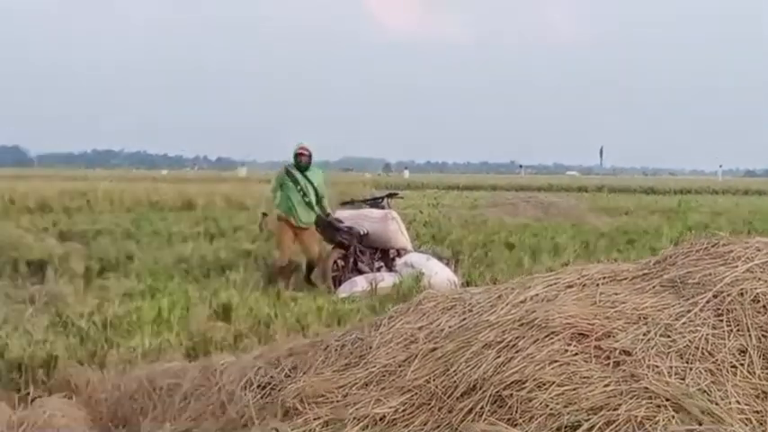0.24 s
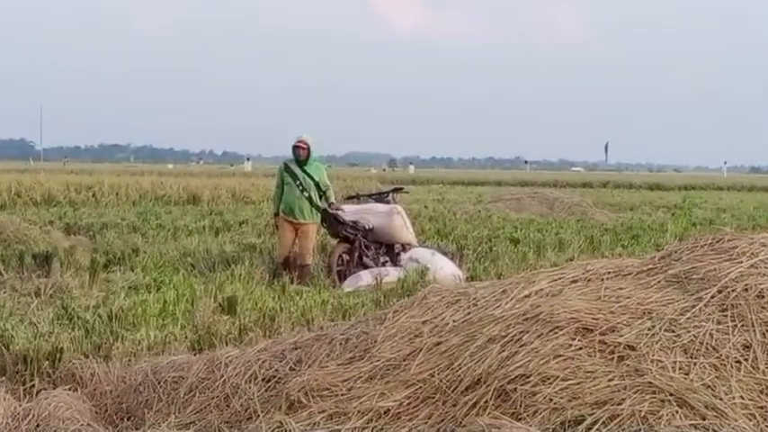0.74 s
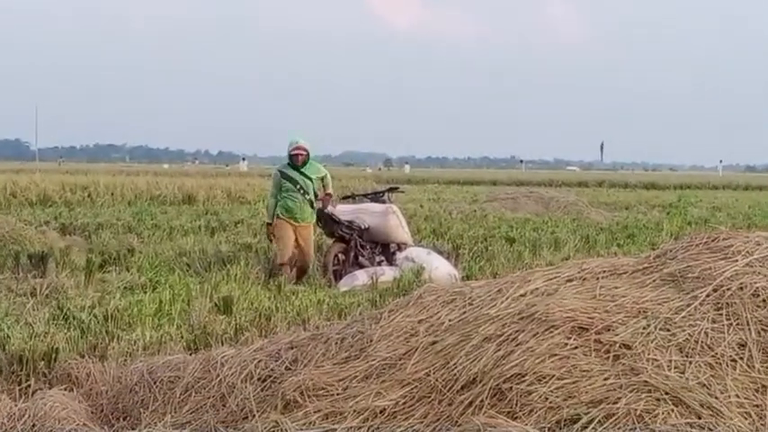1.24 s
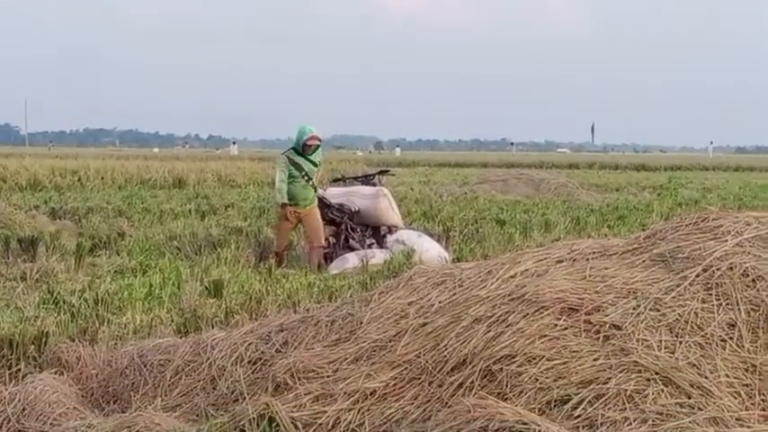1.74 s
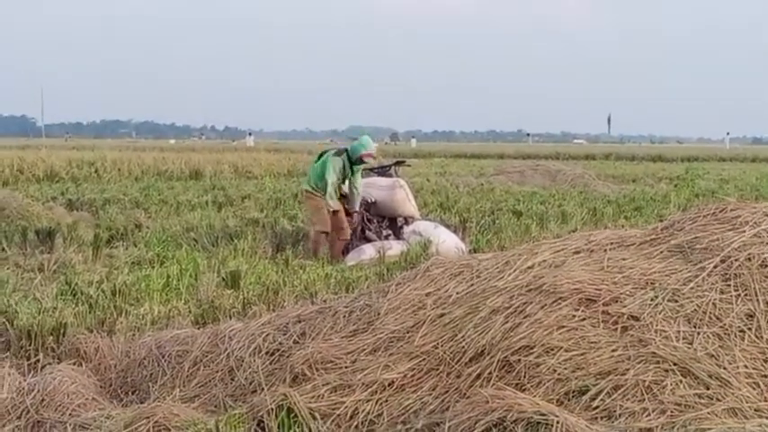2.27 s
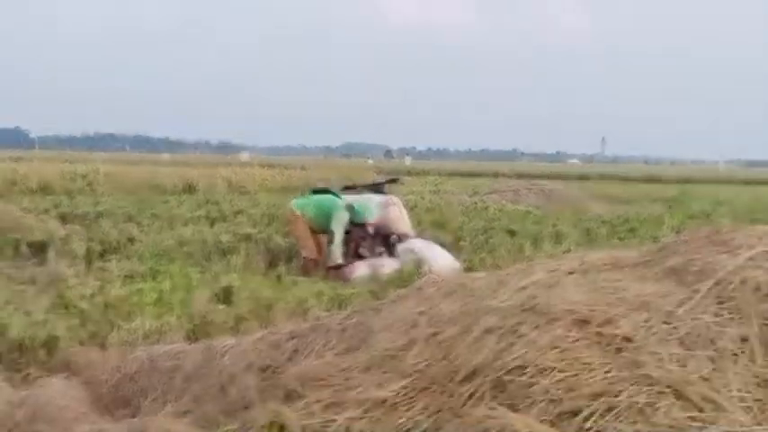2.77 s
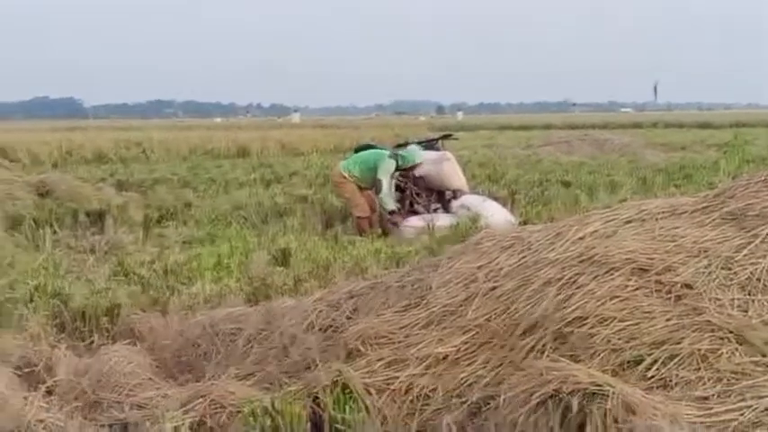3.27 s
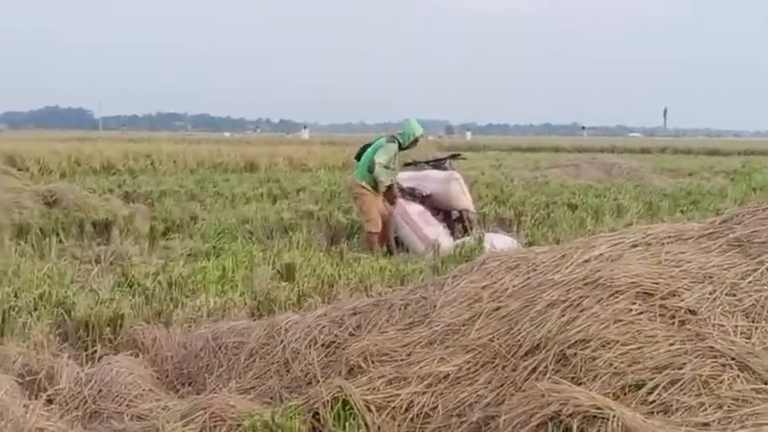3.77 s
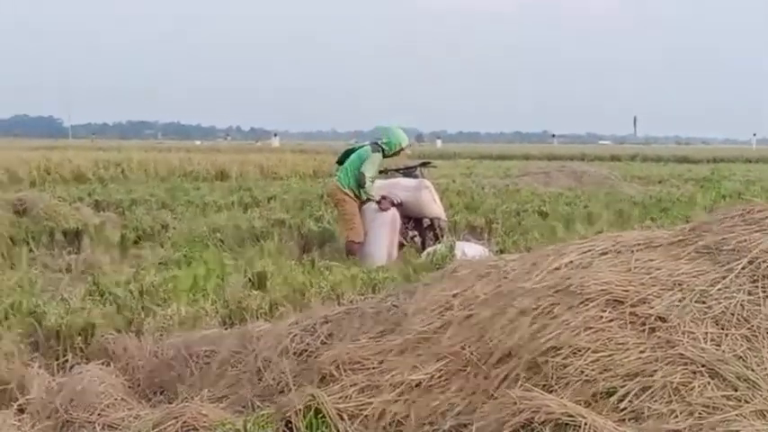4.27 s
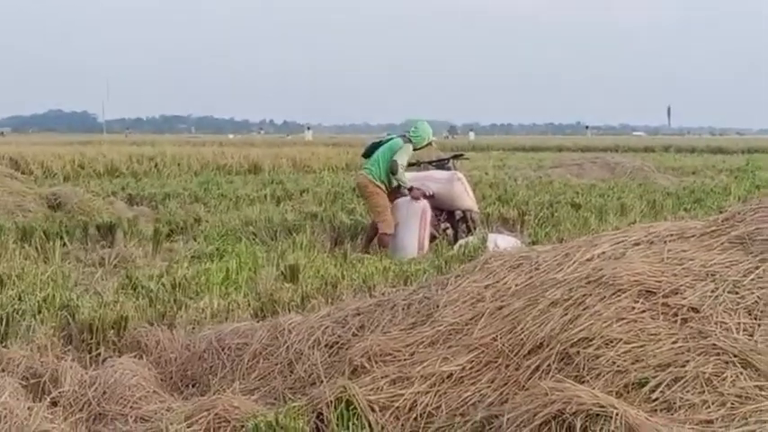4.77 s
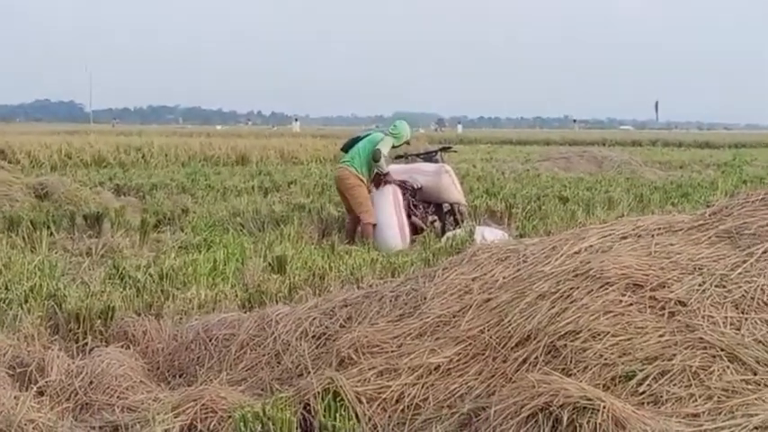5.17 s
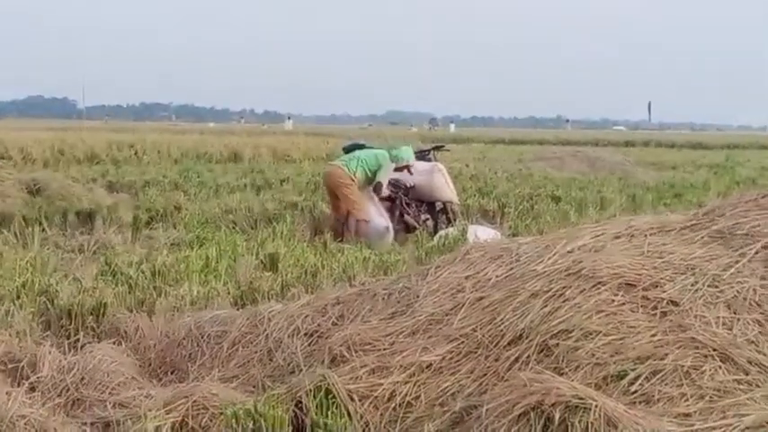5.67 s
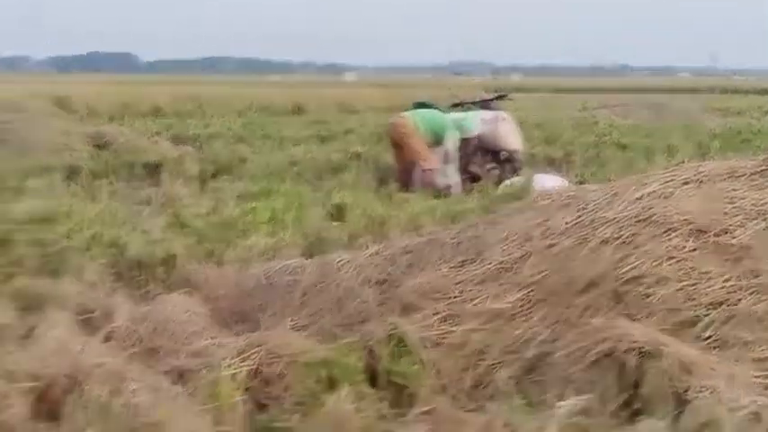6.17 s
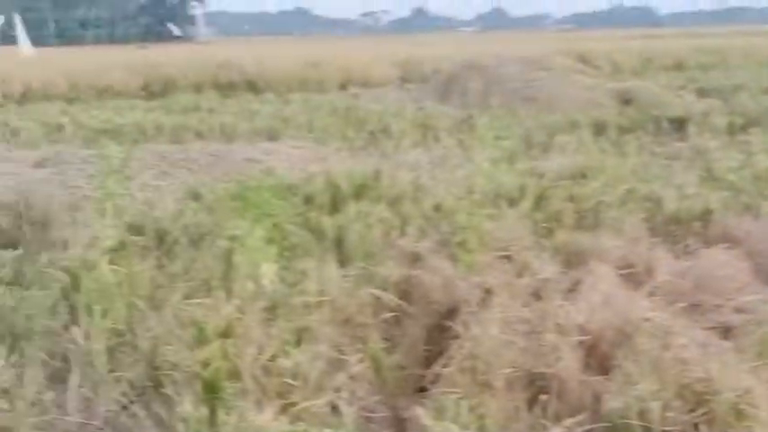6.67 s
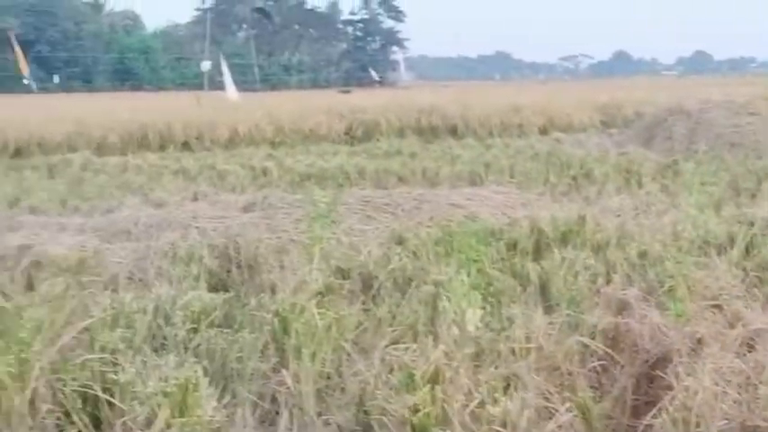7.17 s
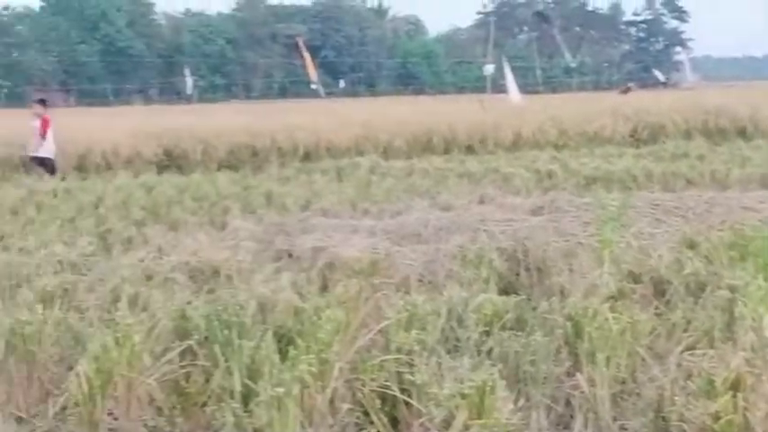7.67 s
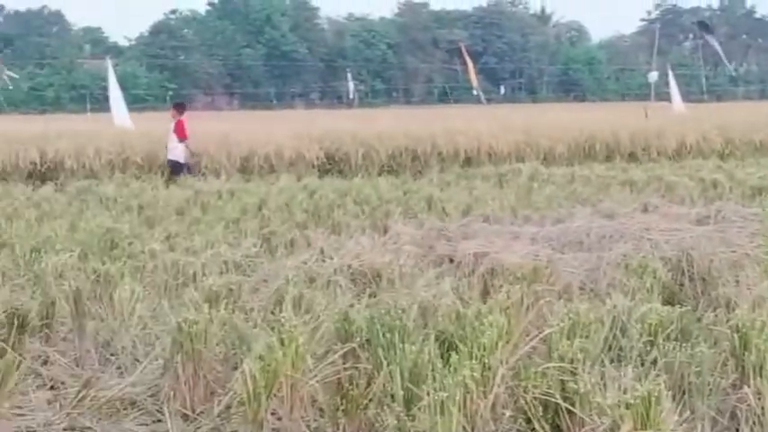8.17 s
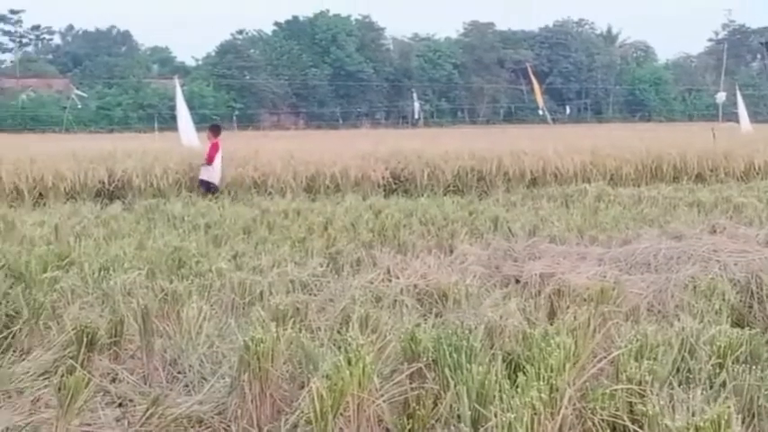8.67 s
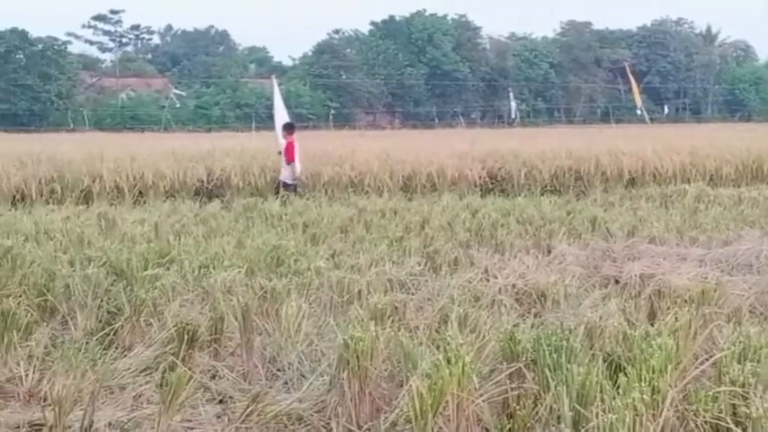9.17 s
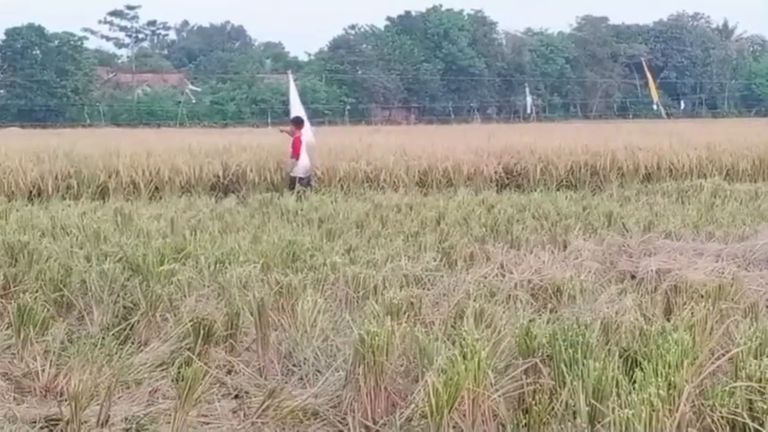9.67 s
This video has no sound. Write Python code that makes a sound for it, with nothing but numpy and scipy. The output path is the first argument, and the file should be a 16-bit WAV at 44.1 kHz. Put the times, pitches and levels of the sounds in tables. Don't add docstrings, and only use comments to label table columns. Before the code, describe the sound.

Across an open rice paddy, a small single-cylinder engine idles from the start, soft low thuds about seventeen a second, slightly uneven, over a dull rumble. Frogs answer all through: very short clear notes near 1.1 kHz roughly every half second, thin peeps, rough rattles and clicking trills around 2.6 kHz, with a faint blurred chorus behind. A steady insect hiss sits near 7 kHz; sharp dry ticks strengthen from 1 to 5 s, then thin out after 6.5 s. A barely audible cricket and tiny straw rustles lie on top. From 6.3 s even frog trills become frequent. Around 7.2 s the engine sags and misfires, leaving a short gap, then coughs back in harder barks by 7.5-7.9 s. It pulls slowly until 8.7 s, then revs to about forty firings a second, loud and raspy, surging slightly until the cut near 9.9 s. The frog chorus swells too. Small mono microphone, short field echoes.

```python
import sys
import numpy as np
from scipy import signal
from scipy.fft import rfft, irfft, next_fast_len
from scipy.io import wavfile
from scipy.ndimage import uniform_filter1d, map_coordinates

SR = 44100
rng = np.random.default_rng(int(sys.argv[2]) if len(sys.argv) > 2 else 0)


def ratio(d):
    e = np.asarray(d, float) / 20
    return 10 ** e


def master(y):
    cut = np.clip(np.atleast_2d(y).T, -1, 1)
    pcm = np.round(cut * 32767)
    wavfile.write(sys.argv[1], SR, pcm.astype(np.int16))


N = 437472


def unit(x):
    return x / np.sqrt(np.mean(x ** 2) + 1e-20)


def curve(rows):
    return np.interp(np.arange(N) / SR, *np.transpose(rows))


def wobble(rate):
    return map_coordinates(rng.standard_normal(int(N * rate / SR) + 4), [np.arange(N) * rate / SR])


def hiss(spectrum):
    size = next_fast_len(N)
    hz, db = np.transpose(spectrum)
    log_hz = np.log(np.fft.rfftfreq(size, 1 / SR) + 1)
    gain = ratio(np.interp(log_hz, np.log(hz), db, left=-120, right=-120))
    return unit(irfft(rfft(rng.standard_normal(size)) * gain, size)[:N])


def patchy(x, depth_db):
    z = signal.stft(x, nperseg=256)[2]
    patches = uniform_filter1d(rng.standard_normal(z.shape), size=4, axis=0)
    patches = uniform_filter1d(patches, size=8, axis=1)
    return unit(signal.istft(z * ratio(depth_db * unit(patches)), nperseg=256)[1][:N])


def add(track, s, piece):
    spot = track[max(round(s * SR), 0):][:len(piece)]
    spot += piece[:len(spot)]


def swell(length, sharp):
    t = np.arange(round(1.7 * length * SR)) / SR
    return t, np.sin(np.pi * t / (1.7 * length)) ** sharp


def burst(t, hz, wide_s):
    return np.exp(-.5 * (t / wide_s) ** 2) * np.sin(2 * np.pi * hz * t)


def field(x, t60):
    t = np.arange(SR // 2) / SR
    tail = rng.standard_normal(len(t)) * ratio(-60 * t / t60) * (t > .006)
    return signal.fftconvolve(x, tail / np.linalg.norm(tail))[:N]


# start_s, firings_so_far
CRANK_TURNS = [
    (-0.037, -1),
    (3.054, 53),
    (3.576, 62),
    (5.104, 89),
    (6.115, 107),
    (6.993, 123),
    (7.205, 127),
    (8.006, 143),
    (8.357, 149),
    (8.69, 155),
               (8.7675, 158), (8.836, 161), (8.878, 163), (8.939, 166), (9.0055, 169), (9.13, 174),
             (9.205, 177), (9.337, 182), (9.4145, 185), (9.586, 192), (9.7015, 197), (9.8347, 203),
             (9.925, 207.1)]
# start_s, bark_peak_db
THROTTLE_LEVELS = [
    (0, -39.5),
    (2, -45),
    (4.5, -44.5),
    (6, -40),
    (7.15, -35.5),
    (7.9, -21),
    (8.69, -21.5),
    (8.815, -13),
    (9.3, -15),
    (9.9, -12.5),
]
# start_s, length_s, boom_change_db
MIXTURE_SPELLS = [(-0.01, 0.06, -6), (0.11, 0.11, -9), (0.34, 0.29, -22), (1.42, 0.06, -0.5),
                  (1.48, 0.17, -4), (1.66, 0.06, 2.5), (1.77, 0.06, 1.5), (1.83, 0.06, -10),
                  (2.05, 0.17, 3.5), (2.34, 0.06, -7), (2.63, 0.29, -2.5), (3.09, 0.06, -10),
                  (3.38, 0.11, 6), (3.61, 0.06, -9), (4.34, 0.06, -21), (4.46, 0.29, 3.5), (4.96, 0.11, -6),
                  (5.13, 0.06, -19), (5.47, 0.06, -16), (5.58, 0.34, 3.5), (5.98, 0.11, -13),
                  (6.14, 0.34, -4.5), (6.47, 0.17, -3.5), (6.97, 0.06, -6), (0.9, 0.11, -2.5),
                  (1.2, 0.17, -0.5), (3.9, 0.17, 1), (6.66, 0.17, -0.5)]
# start_s, boom_peak_db, bark_peak_db
STUMBLE_FIRINGS = [(7.289, -59, -54), (7.392, -32, -37.5), (7.449, -27, -34.5), (7.503, -21, -29),
                   (7.537, -19.5, -20), (7.584, -26, -62), (7.619, -33, -53), (7.703, -29.5, -22),
                   (7.74, -27, -19), (7.772, -26, -18), (7.802, -22.5, -18), (7.831, -26.5, -18),
                   (7.861, -27, -31), (7.888, -22, -17.5), (7.946, -24, -20.5)]
PULL_FROM_S, PULL_TO_S = 7.88, 8.66
RUN_FREE_S = 8.7


def firings():
    s, count = np.transpose(CRANK_TURNS)
    times = np.interp(np.arange(int(count[-1]) + 1), count, s)
    times[157:-2] = uniform_filter1d(times, size=5)[157:-2]
    luck = rng.standard_normal((len(times), 3))
    boom_db = -26 + 1.67 * luck[:, 1]
    for at, length, db in MIXTURE_SPELLS:
        boom_db = boom_db + db * (times > at) * (times < at + length)
    bark_luck_db = 1.5 * luck[:, 2] * np.where(times < RUN_FREE_S, 1, .4)
    bark_db = np.interp(times, *np.transpose(THROTTLE_LEVELS)) + bark_luck_db
    odd = slice(128, 128 + len(STUMBLE_FIRINGS))
    times[odd], boom_db[odd], bark_db[odd] = np.transpose(STUMBLE_FIRINGS)
    return times + 0.00099 * luck[:, 0] * (times < RUN_FREE_S), boom_db, bark_db


def piped(blows, hz, spread_hz, echo_db, phase):
    f = np.fft.rfftfreq(SR // 2, 1 / SR)
    wavelet = np.exp(-.5 * ((f - hz) / spread_hz) ** 2 - 1j * phase) * (f / hz) ** 2 / (1 + (f / hz) ** 2)
    echo = min(ratio(echo_db), .8) * np.exp(-2j * np.pi * f * 0.006577)
    ring = np.roll(irfft(wavelet / (1 - echo)), 2000)[:SR // 5]
    return signal.fftconvolve(blows, ring / abs(ring).max())[2000:][:N]


# start_s, peak_db
LOOSE_PUFFS = [(0.728, -26.5), (0.842, -30.5), (1.775, -30.5), (1.882, -31), (2.275, -32), (2.573, -28),
               (2.675, -31), (2.973, -25.5), (3.266, -25), (3.377, -29), (3.563, -27), (3.784, -27.5),
               (4.282, -27), (4.68, -26.5), (4.785, -32), (5.525, -28), (7.234, -34), (7.413, -26),
               (1.655, -29), (2.171, -28), (7.923, -25.5), (7.976, -28), (8.043, -24.5), (8.104, -25),
               (8.212, -21.5), (8.275, -29), (8.393, -22), (8.444, -27), (8.502, -22.5), (8.55, -27),
               (8.609, -26.5), (8.666, -25.5)]
# pitch_hz, spread_hz, pipe_echo_db
BOOM_RING = (135.2, 23.7, -17)
# pitch_hz, spread_hz, pipe_echo_db
LOADED_RING = (197, 30.4, -3.5)
# pitch_hz, spread_hz, pipe_echo_db
BARK_RING = (286, 94, -14.5)
# pitch_hz, spread_hz, pipe_echo_db
PULL_RING = (309, 55.5, -8)
# pitch_hz, spread_hz, pipe_echo_db
IDLE_RING = (260.7, 31.7, -5)


def engine():
    times, boom_db, bark_db = firings()
    clock = np.arange(N + SR) / SR
    boom, bark, puff = np.zeros((3, N + SR))
    scatter = .0012 * rng.standard_normal(len(times)) * (times > PULL_FROM_S)
    boom_times = times + .004 * (times < RUN_FREE_S) + scatter
    pulling = (times > PULL_FROM_S) * (times < PULL_TO_S)
    boom_db = boom_db - 0.5 * (times > PULL_TO_S) - 3 * pulling
    boom[np.round(boom_times * SR).astype(int)] = ratio(boom_db)
    bark[np.round(times * SR).astype(int)] = ratio(bark_db)
    for s, db in LOOSE_PUFFS:
        puff[round(s * SR)] = ratio(db)
    gas = uniform_filter1d(bark, size=900) * rng.standard_normal(N + SR)
    sharp = bark + 3 * gas
    throttle_db = np.interp(clock, *np.transpose(THROTTLE_LEVELS))
    load = np.clip((throttle_db + 32.5) / 10.5, 0.16, 1)
    rush = np.clip((throttle_db + 20) / 8, .03, 1)
    weak = sharp * (1 - load)
    loaded_boom = boom * (clock > 7.65)

    soft = piped(boom, *BOOM_RING, phase=0.16) + piped(puff, 138.4, 18.0, -6.0, phase=0)
    soft += ratio(1) * piped(loaded_boom, *LOADED_RING, phase=0.15)
    hard = piped(sharp * load * rush, *BARK_RING, phase=0.26)
    hard += piped(sharp * load * (1 - rush), *PULL_RING, phase=0.17)
    idle = piped(weak, *IDLE_RING, phase=0.97) + ratio(-18.5) * piped(weak, 430, 32, -8.0, phase=0.86)
    roar = piped((0.86 * gas + ratio(-30) * bark) * rush, 490, 66, -2.5, phase=1.0)
    roar += ratio(-4.5) * piped((0.43 * gas + ratio(-33.5) * bark) * rush, 590, 95, -16.5, phase=1)
    roar += ratio(2.0) * piped(gas * load, 450, 92, -9.5, phase=1.0)
    return soft + hard + idle + roar


# pitch_hz, level_db (per Hz)
RUMBLE_COLOUR = [(12, -69.5), (20, -30.5), (70, -5.5), (151, 13), (230, -3), (586, -32), (700, -32.5),
                 (910, -40.5), (1540, -120)]
# start_s, length_s
MISFIRE_GAPS = [
    (7.235, 0.089),
    (7.625, 0.042),
]


def rumble():
    level = np.ones(N)
    for s, length in MISFIRE_GAPS:
        add(level, s, -0.65 * swell(length, sharp=0.64)[1])
    return ratio(-43.0 + 2.3 * wobble(12) + 4.1 * wobble(30)) * level * hiss(RUMBLE_COLOUR)


# start_s, level_db
CHORUS_LEVELS = [
    (0, -69),
    (1.5, -72.5),
    (4.5, -69.5),
    (6.5, -69),
    (9, -62.5),
    (9.92, -61.5),
]
# pitch_hz, level_db (per Hz)
CHORUS_COLOUR = [(350, -66), (600, -38), (919, -7), (1110, -0.5), (1830, -13), (2420, -2.5), (3380, -12),
                 (5000, -32.5), (6500, -49), (11000, -120)]


def far_frogs():
    lumps_db = np.clip(3 * wobble(15) + 3 * wobble(60), -12, 7)
    lumpy = ratio(lumps_db + 3.0) * patchy(hiss(CHORUS_COLOUR), depth_db=6.5)
    return ratio(curve(CHORUS_LEVELS)) * (lumpy + ratio(-4.5) * hiss(CHORUS_COLOUR))


# pitch_hz, level_db (per Hz)
INSECT_COLOUR = [(4800, -46), (5830, -25.5), (6350, -11.5), (6700, 0.5), (7050, 5.5), (7450, -14),
                 (8310, -75.5), (10800, -110)]


def insect_crowd():
    level_db = -50 + 0.34 * wobble(11.0) + 1.2 * wobble(14) + 0.28 * wobble(40)
    return ratio(level_db) * patchy(hiss(INSECT_COLOUR), depth_db=1.5)


# start_s, length_s, pitch_hz, peak_db
FAR_WHISTLES = [(0, 0.1, 1520, -52), (.24, .025, 2680, -62), (.305, 0.035, 2486, -52),
                (0.379, 0.016, 2260, -51.5), (0.417, 0.025, 2300, -54), (0.607, .05, 1200, -57),
                (0.783, .03, 1060, -56), (0.736, 0.02, 2560, -51.5), (0.888, 0.02, 3090, -52),
                (1.064, 0.026, 2980, -55.5), (1.422, 0.021, 2280, -58), (1.454, 0.025, 2970, -57),
                (1.596, 0.014, 2156, -43), (1.666, 0.019, 3100, -60), (2.73, 0.048, 1294, -53.5),
                (2.794, 0.061, 2650, -50.5), (3.76, 0.012, 2530, -67), (3.804, 0.011, 2420, -44),
                (4.031, .035, 1496, -52.5), (4.42, 0.039, 2390, -56), (4.459, 0.023, 2680, -48.5),
                (4.578, 0.033, 2485, -51), (4.583, 0.024, 2900, -50), (4.698, 0.017, 2570, -54),
                (5.137, 0.026, 2525, -50), (5.417, 0.045, 1076, -54), (5.49, 0.021, 2620, -51),
                (6.476, 0.028, 2805, -42.5), (6.54, 0.04, 2810, -48.5), (6.925, 0.063, 1780, -65),
                (0.648, 0.027, 2960, -53.5), (7.594, 0.011, 2310, -29.5), (8.52, .04, 2700, -71),
                (7.281, 0.022, 2500, -58), (8.699, 0.025, 2294, -40), (8.853, 0.052, 2220, -50.5),
                (9.053, 0.039, 1650, -57.5), (9.46, 0.042, 2830, -42.5), (9.519, 0.057, 1104, -56),
                (9.552, 0.027, 1710, -50), (2.245, 0.056, 1118, -54.5), (2.12, 0.031, 1160, -54),
                (1.9, 0.026, 1158, -60), (3.52, 0.088, 1090, -59.5), (6.205, .02, 1102, -46),
                (8.21, 0.051, 1200, -51.5), (9.06, 0.027, 2740, -52), (9.22, 0.013, 2810, -42),
                (9.59, 0.015, 2960, -42)]


def whistles():
    out, waver, flutter_db = np.zeros(N), 0.96 * wobble(140), 4 * wobble(170)
    for s, length, hz, db in FAR_WHISTLES:
        t, shape = swell(length, sharp=1.0)
        here = slice(round(s * SR), round(s * SR) + len(t))
        turn = 2 * np.pi * hz * t * (1 + 0.0068 * (t / t[-1] - 1)) + waver[here]
        add(out, s - 0.18 * length, ratio(db + flutter_db[here]) * shape * np.sin(turn))
    return out


def far_calls(count):
    luck = rng.random((count, 5))
    s = (np.arange(count) + luck[:, 0]) * N / SR / count
    length = .012 + .022 * luck[:, 2]
    throat_db = np.interp(s, *np.transpose(CHORUS_LEVELS)) + 4.5 + 10.0 * luck[:, 1]
    sac_db = throat_db - 9.0 - 8 * luck[:, 2]
    return np.transpose([s, length, 1080 + 400 * luck[:, 3], 2200 + 800 * luck[:, 4], sac_db, throat_db])


# start_s, length_s, throat_hz, sac_peak_db
ROUGH_RATTLES = [(0.054, 0.028, 2590, -34), (0.451, 0.018, 2680, -30), (0.557, 0.02, 2490, -41.5),
                 (1.248, 0.025, 2610, -48), (1.32, 0.02, 2560, -37), (1.599, 0.033, 2270, -58.5),
                 (1.939, 0.009, 2586, -34.5), (2.55, 0.015, 2410, -35), (2.64, 0.017, 2560, -40.5),
                 (3.136, 0.019, 2480, -42), (3.217, 0.018, 2520, -38.5), (3.995, 0.01, 2500, -36.5),
                 (5.027, 0.05, 2560, -47), (5.066, 0.01, 2390, -32), (5.665, 0.015, 2660, -36),
                 (5.713, 0.035, 2530, -42.5), (5.812, 0.035, 2590, -47), (6.262, 0.012, 2490, -33.5),
                 (6.411, 0.029, 2690, -39), (6.861, 0.017, 2325, -34), (7.507, 0.018, 2770, -35),
                 (7.969, 0.024, 2780, -33.5), (8.043, 0.034, 2690, -35.5), (8.345, 0.0089, 2720, -27.5),
                 (8.356, 0.012, 2700, -27), (8.43, 0.014, 2700, -35), (8.483, 0.0083, 2700, -40.5),
                 (8.495, 0.014, 2710, -36.5), (9.263, 0.012, 2720, -30)]
# start_s, length_s, throat_hz, throat_peak_db
STRAY_TRILLS = [(0.188, 0.019, 2440, -36), (0.077, 0.017, 2397, -26.5), (0.77, 0.015, 2467, -28),
                (0.915, 0.024, 2490, -38), (2.571, 0.04, 2610, -41), (3.703, 0.012, 2500, -46.5),
                (4.586, 0.032, 2700, -56), (4.777, 0.03, 2490, -46.5), (4.966, 0.015, 2720, -37.5),
                (5.188, 0.021, 2610, -45.5), (5.321, 0.014, 2570, -38.5), (5.397, 0.039, 2470, -43.5),
                (5.585, 0.018, 2560, -37.5)]
# start_s, length_s, peak_db
SOFT_COOS = [
    (2.574, 0.022, -44.5),
    (3.588, 0.037, -53),
    (4.398, 0.032, -52),
    (4.776, 0.03, -52.5),
    (5.186, 0.034, -50.5),
    (5.564, 0.022, -45),
    (5.965, 0.028, -50),
]
# start_s, length_s, throat_hz, throat_peak_db
EVEN_TRILLS = [(6.309, 0.033, 2580, -33.5), (6.648, 0.025, 2600, -29.5), (6.727, 0.025, 2560, -41),
               (6.815, 0.027, 2764, -30.5), (6.892, 0.012, 2850, -32.5), (7.001, 0.023, 2560, -26),
               (7.074, .04, 2640, -45), (7.18, 0.026, 2740, -29.5), (7.209, .031, 2800, -37.5),
               (7.254, 0.022, 2680, -42.5), (7.4, 0.027, 2650, -29.5), (7.58, 0.024, 2690, -30),
               (7.673, 0.033, 2770, -37.5), (7.767, 0.027, 2664, -29.5), (8.147, 0.025, 2653, -28.5),
               (8.242, 0.022, 2640, -35.5), (8.336, 0.0053, 2590, -42), (8.4, 0.032, 2800, -44.5),
               (8.445, 0.03, 2630, -35.5), (8.571, 0.021, 2675, -28), (8.63, 0.043, 2650, -49.5),
               (8.697, 0.027, 2660, -36.5), (8.766, 0.046, 2740, -32), (8.84, 0.033, 2550, -45),
               (8.938, .024, 2670, -26.5), (8.99, 0.049, 2690, -44), (9.14, 0.038, 2770, -30.5),
               (9.335, 0.023, 2666, -26.5), (9.427, 0.016, 2630, -37.5), (9.512, 0.036, 2770, -33.5),
               (9.555, 0.026, 2600, -38.5), (9.63, 0.019, 2670, -32), (9.662, 0.019, 2615, -27.5),
               (9.745, 0.029, 2650, -34.5), (9.85, 0.025, 2830, -34)]


def near_calls():
    return ([(s, length, 1190, hz, db, db - 1.5) for s, length, hz, db in ROUGH_RATTLES]
            + [(s, length, 1200, hz, db - 14.5, db) for s, length, hz, db in EVEN_TRILLS]
            + [(s, length, 1170, hz, db - 22, db) for s, length, hz, db in STRAY_TRILLS]
            + [(s, length, 1450, 2600, db, db - 17.0) for s, length, db in SOFT_COOS])


def croaks(calls):
    out, t = np.zeros(N), np.arange(SR // 80) / SR - .005
    all_luck = np.clip(rng.standard_normal((len(calls), 4, 50)), -2, 2)
    for (s, length, sac_hz, hz, sac_db, throat_db), luck in zip(calls, all_luck):
        big = sac_db > throat_db - 8
        ragged = length > .03
        jitter = .15 if big else .22 if ragged else .04
        clicks_per_s = (310 if big else 157) * (1 + 0.045 * luck[2, 0])
        times = np.cumsum(1 + jitter * luck[0]) / clicks_per_s
        done = (times[times < 1.7 * length] / (1.7 * length))[:, None]
        size, bend = luck[1, :len(done), None], luck[3, :len(done), None]
        shape = np.sin(np.pi * done) ** (.9 if big else .95) * np.exp(-(.3 if big else -.15) * done)
        shape = shape * 0.89 * ratio((3.5 if big or ragged else 1.1) * size)
        tight = 1 + .025 * (done - .5) + .018 * bend
        split = (.11 if big else .036) + (0.026 if big else .012) * luck[2, 1]

        throat = burst(t, (1 - split) * hz * tight, 0.00092 if big else .00105)
        throat = throat + burst(t, (1 + split) * hz * tight, 0.0019) + 0.99 * big * burst(t, hz * tight, 0.0005)
        upper = ratio(-17.5 + 4.6 * luck[2, 3]) * (.8 if big else done)
        throat = throat + upper * burst(t, 1.455 * hz * tight, 0.0011)
        edge = ratio((-26 if big else -36) + 4.5 * bend)
        throat = throat + edge * burst(t, 4900 * (1 + .12 * size) * tight, 0.00038)
        octave_hz = (2.04 + .04 * luck[2, 2]) * hz
        throat = throat + ratio(-34 + 3 * luck[2, 4]) * burst(t, octave_hz * tight, .0014)

        sac = burst(t, sac_hz * tight, .0018)
        sac = sac + ratio(-12 if big else -3) * burst(t, 1.264 * sac_hz * tight, 0.0011)
        sac = sac + ratio(-16.5) * big * burst(t, 0.94 * sac_hz * tight, .0012)
        clicks = shape * (ratio(throat_db + 2.5) * throat + ratio(sac_db + 3.0) * sac)
        for wait, click in zip(times, clicks):
            add(out, s + wait - 0.2 * length - (.005 if big else .007), click)
    return out


# start_s, peak_db
HARD_TICKS = [(0.325, -44), (0.717, -35), (0.793, -33.5), (1.0117, -33), (1.178, -34), (1.301, -26),
              (1.55, -27), (1.7426, -26.5), (1.957, -25.5), (2.4445, -23.5), (2.638, -21.5), (2.8116, -23),
              (3.021, -21), (3.226, -18.5), (3.705, -19), (3.8603, -29.5), (3.9289, -16), (4.0508, -26.5),
              (4.311, -17.5), (4.47, -30.5), (4.539, -17), (4.655, -29), (4.789, -16), (4.8492, -28),
              (5.062, -28), (5.2672, -26.5), (5.47, -27), (6.1362, -29), (6.333, -28), (6.5393, -30)]
# start_s, peak_db
SOFT_TICKS = [(.12, -40), (.345, -33), (.529, -34), (.58, -43), (.596, -37), (0.986, -37), (0.996, -42),
              (1.115, -32), (1.279, -33), (1.31, -38), (1.479, -48), (1.492, -33.5), (1.679, -34),
              (2.394, -38), (2.593, -36.5), (2.927, -37), (2.999, -50), (3.119, -32), (3.343, -30),
              (3.668, -32), (4.723, -37), (5.57, -37), (5.663, -31), (5.885, -47), (6.236, -38),
              (6.445, -50), (6.769, -32.5), (6.968, -34.5), (7.18, -41), (8.118, -45), (8.353, -33.5)]


def ticks():
    out, t = np.zeros(N), np.arange(SR // 80) / SR - .005
    every = HARD_TICKS + SOFT_TICKS
    for (s, db), luck in zip(every, rng.standard_normal((len(every), 4))):
        rough = 1 + 0.47 * uniform_filter1d(rng.standard_normal(len(t)), size=16)
        scrape_hz = 8200 + 28 * db + 120 * luck[0] - 40000 * t
        scrape = rough * burst(t - .0018, scrape_hz, .0013)
        late = t - (.0036 + .0016 + .0004 * luck[1])
        snap = burst(late, 6700 + 250 * luck[2], 0.00031)
        snap = snap + ratio(-38 - .5 * db) * burst(late, 5000, 0.000078)
        snap = snap + ratio(-5.0) * burst(t - .0008, 6700, 0.00024)
        add(out, s - .005, ratio(db - 3.5) * scrape + ratio(0.62 * db - 10.5 + 1.4 * luck[3]) * snap)
    out = signal.sosfilt(signal.butter(12, 8250, fs=SR, output="sos"), out)
    highpass = signal.butter(6, 5100, "highpass", fs=SR, output="sos")
    return out + ratio(-12.0) * signal.sosfilt(highpass, field(out, t60=0.16))


def rasps():
    out, t = np.zeros(N), np.arange(SR // 8) / SR
    band = signal.butter(3, [7400, 8080], "bandpass", fs=SR, output="sos")
    for s, db in HARD_TICKS:
        rasp = unit(signal.sosfilt(band, rng.standard_normal(len(t))))
        decay = ratio(db / 2 - 23 - 6 * s - 60 * t / 0.056)
        add(out, s - .004, decay * np.clip(t / 0.0014, 0, 1) * rasp)
    return out


# start_s, length_s, pitch_hz, peak_db
THIN_PEEPS = [
    (0.935, 0.012, 1170, -32.5),
    (1.038, 0.019, 1200, -51.5),
    (2.083, 0.027, 1170, -40.5),
    (2.868, 0.02, 1190, -35),
    (3.448, 0.014, 1236, -31),
    (4.175, 0.013, 1223, -32.5),
    (4.87, 0.013, 1170, -51.5),
]
# start_s, length_s, pitch_hz, first_harmonic_db, second_harmonic_db
CLEAR_NOTES = [(1.167, 0.014, 1167, -24, -30.5), (1.842, 0.018, 1160, -24.5, -31.5),
               (2.21, 0.019, 1114, -41.5, -24.5), (2.457, 0.02, 1144, -27, -31),
               (3.051, 0.015, 1162, -23.5, -28), (3.478, 0.016, 1111, -41.5, -27),
               (3.897, 0.02, 1114, -29.5, -35), (4.282, 0.015, 1081, -40.5, -25.5),
               (4.971, 0.017, 1090, -29.5, -27), (5.574, 0.017, 1108, -30.5, -29),
               (5.606, 0.013, 1087, -36, -23), (6.167, .018, 1097, -30.5, -29),
               (6.774, 0.021, 1101, -27, -36.5), (7.414, 0.017, 1139, -23, -37),
               (7.89, 0.018, 1157, -21.5, -28.5), (9.161, 0.019, 1141, -22, -23),
               (9.876, 0.017, 1135, -21, -25.5)]


def notes():
    out = np.zeros(N)
    full = [(*row, max(row[3:]) - 22 + 0.223 * (row[2] - 1127)) for row in CLEAR_NOTES]
    peeps = [(s, length, hz, db - 13, db, db - 49.5) for s, length, hz, db in THIN_PEEPS]
    for s, length, hz, first_db, second_db, upper_db in full + peeps:
        t, shape = swell(length * 0.94, sharp=0.28)
        done = t / t[-1]
        attack = np.clip(t / 0.0066, 0, 1) ** 0.54
        release = np.clip((t[-1] - t) / 0.0039, 0, 1)
        shape = shape * (0.95 + 0.52 * done) * attack * release
        shake = uniform_filter1d(np.cumsum(rng.standard_normal(len(t))), size=40)
        thin = second_db > first_db + 8
        rise = .115 if hz > 1155 else .055
        glide = 1 + rise * (np.sqrt(done) - .75)
        turn = 2 * np.pi * np.cumsum(hz * glide) / SR + 0.0044 * shake
        stack = [first_db, second_db, upper_db + 3.5 - 8 * thin, upper_db - 14 * (not thin), upper_db - 9.5]
        flutter = 1 + (.06 if thin else .14) * np.sin(2 * np.pi * 300 * t + .08 * shake) * np.exp(-done)
        press = shape * done ** 2 * 1.46
        voice = ratio(second_db - 21.5) * np.sin(3.0 * turn + 0.14 * shake) * np.exp(-1.2 * done)
        for k, db in enumerate(stack):
            partial = ratio(db) * np.cos((k + 1) * turn + k)
            voice = voice + partial * (press if k > 1 else 1) * (flutter if k else 1)
        add(out, s - 0.36 * length, -shape * voice)
    return out


# start_s, level_db
CRICKET_LEVELS = [
    (0, -99),
    (1.2, -93),
    (1.4, -112),
    (4.8, -106),
    (5, -99),
    (6.2, -96.5),
    (7.17, -83),
    (7.22, -100),
    (9.9, -97.5),
]


def cricket():
    t = np.arange(N) / SR
    chirps = np.clip(3 * np.sin(2 * np.pi * 8.2 * t + 1.5 + .4 * wobble(1.5)) + 1.5, 0, 1)
    strokes = np.sin(np.pi * 160 * t) ** 2
    tone = np.sin(2 * np.pi * 9480 * t + 3.4 * wobble(150))
    return ratio(curve(CRICKET_LEVELS) + 11.0) * chirps * (.3 + strokes) * tone


# pitch_hz, level_db (per Hz)
AIR_COLOUR = [(9000, -25.5), (11000, -16), (14000, -4.5), (15300, -0.5), (15600, -42.5)]
# start_s, length_s, level_db
STRAW_RUSTLES = [
    (1.268, 0.0037, -70.5),
    (3.226, 0.086, -77),
    (4.312, 0.011, -70),
    (4.778, 0.023, -71),
    (5.183, 0.0061, -73),
    (7.621, 0.0038, -68.5),
    (7.766, .13, -75.5),
]


def straw():
    level = np.full(N, ratio(-92))
    for s, length, db in STRAW_RUSTLES:
        add(level, s, ratio(db) * swell(length, sharp=.6)[1])
    return level * ratio(1.5 * wobble(30)) * hiss(AIR_COLOUR)


def scene():
    motor = engine()
    frogs = whistles() + croaks(near_calls()) + croaks(far_calls(count=110)) + notes()
    dull = signal.butter(2, 3600, fs=SR, output="sos")
    wet = ratio(-9.0) * signal.sosfilt(dull, field(frogs, t60=0.094)) + ratio(-17) * field(motor, t60=.15)
    insects = insect_crowd() + ticks() + rasps()
    return (motor + rumble() + far_frogs() + frogs + wet + insects + cricket() + straw())[None]


def roll_off(x):
    return signal.sosfilt(signal.butter(12, 15500, fs=SR, output="sos"), x)


def record(dry):
    mix = dry / (1 + abs(dry / .43) ** 10) ** .1
    return roll_off(mix)


dry = scene()
out = record(dry)
master(out)
```